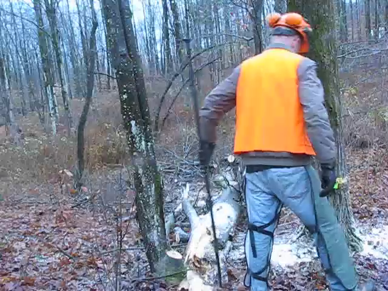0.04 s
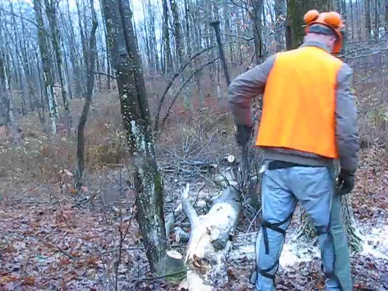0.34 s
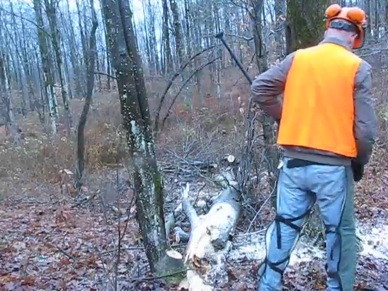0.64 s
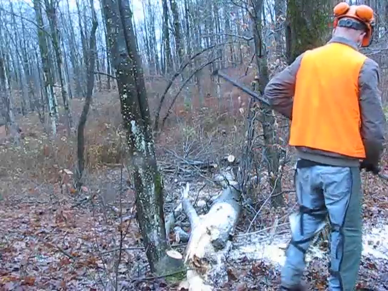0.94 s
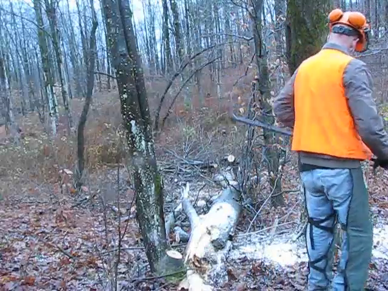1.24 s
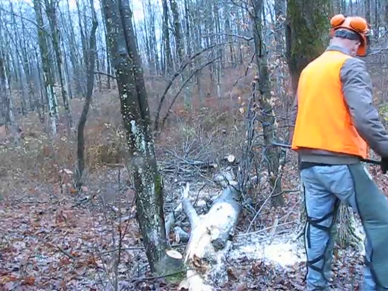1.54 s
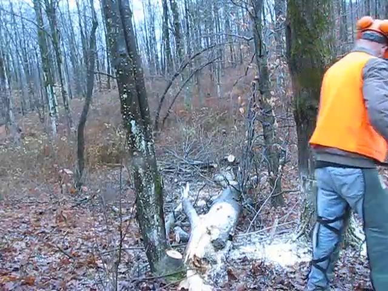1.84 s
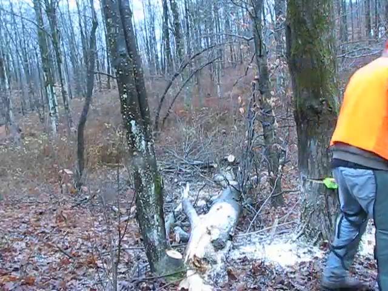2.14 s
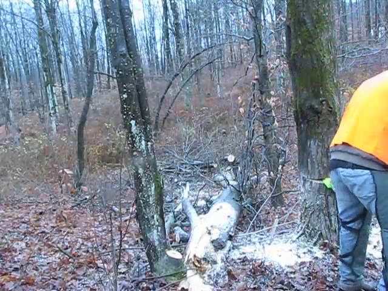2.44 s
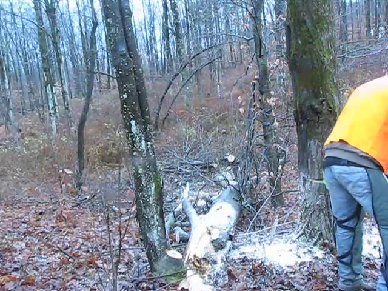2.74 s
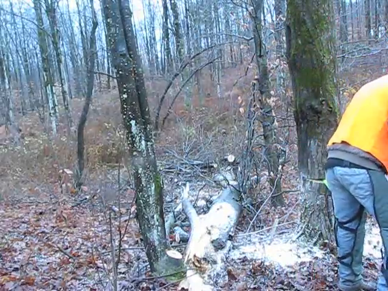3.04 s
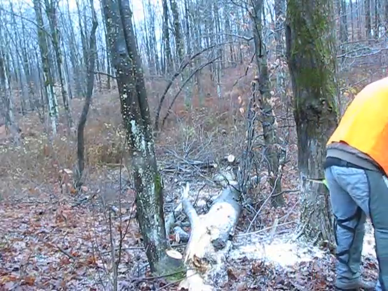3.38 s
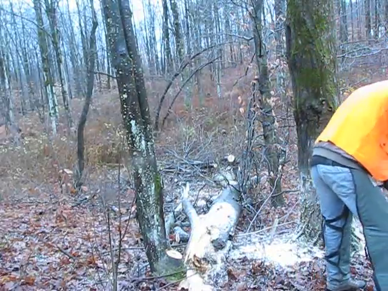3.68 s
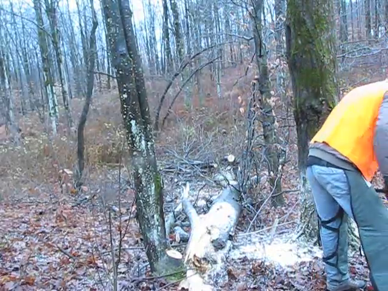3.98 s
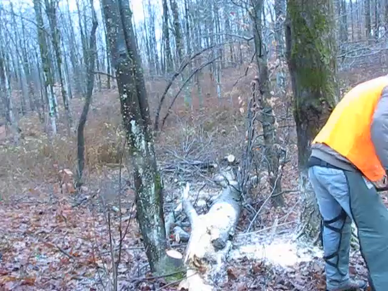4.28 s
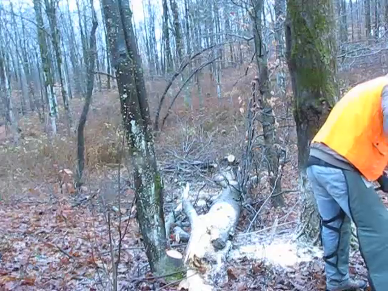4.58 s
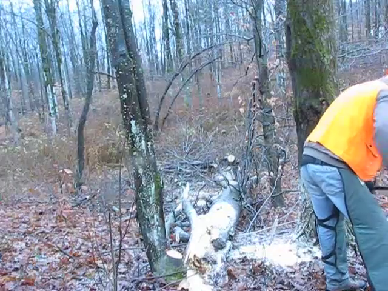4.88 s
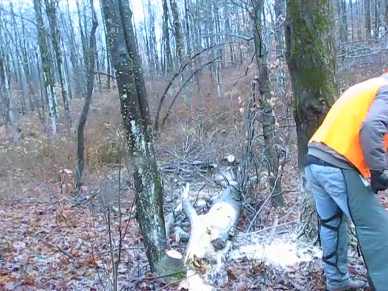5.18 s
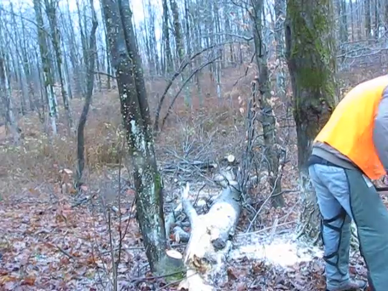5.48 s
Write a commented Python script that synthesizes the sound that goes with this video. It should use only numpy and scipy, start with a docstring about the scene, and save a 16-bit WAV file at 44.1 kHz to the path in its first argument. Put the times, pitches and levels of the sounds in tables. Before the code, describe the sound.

After steps in crackling dry leaves, an axe hammers a wedge into a trunk three times, each crack ringing metallically through the forest.

```python
"""Over faint forest air, a man steps through dry leaves and snapping twigs and halts at a standing tree.
He drives a felling wedge into it with three blows of an axe's poll. Each impact cracks in the wood,
sets the steel head ringing in its modes and sends bending waves along the trunk. Nearby ground and
trunks scatter the sound, then the forest answers with a long soft tail and an echo from a far slope.
Between blows his jacket swishes with the backswing."""
import sys
import numpy as np
from scipy import signal
from scipy.fft import rfft, irfft, next_fast_len
from scipy.io import wavfile
from scipy.ndimage import uniform_filter1d, map_coordinates

SR = 44100
rng = np.random.default_rng(int(sys.argv[2]) if len(sys.argv) > 2 else 0)


def unload_audio(sound):
    """Save the sound as a 16-bit wav file, at the path given as the first command line argument."""
    columns = np.transpose(np.atleast_2d(sound))
    # keep every value between -1 and 1, then stretch to whole-number steps
    steps = np.round(np.clip(columns, -1, 1) * 32767)
    wavfile.write(sys.argv[1], SR, steps.astype(np.int16))


N = 247842
T = np.arange(N) / SR
LN_1000 = np.log(1000)  # an amplitude decay of 60 dB, reached at time t60


# spectrum of the crack in the wood: f/Hz, level/dB
CRACK_SPECTRUM = [(25, 5.5), (80, 3), (160, 22), (320, 9), (900, 21.5), (3000, 16), (4600, 12), (6500, 1.5),
                  (10000, -1), (16000, -17)]
# wedge in its cut: f/Hz, bandwidth/Hz, relative level/dB at blows 1, 2, 3
WEDGE_MODES = [(519, 47, 9.5, 35.5, 33.9), (658, 89.4, 24, 31.8, 31.6), (847, 63, 18, 24.4, 24.3),
               (1150, 34, 35.5, 28.4, 30.2), (1268, 76, 31.5, 22, 28), (1586, 178, 33.5, 29, 30.6),
               (1768, 88, 32.5, 24, 29), (1982, 170, 29.5, 26.1, 23), (2580, 575, 22, 19.1, 20.3),
               (3230, 120, 9, 5, 26.1), (3640, 460, 16, 23.9, 18.4)]

def wedge(blow, crack_db, seating):
    """Source and filter: the contact force excites a broad crack and damped modes of wedge and wood."""
    t = T[:4096]
    response = amp(crack_db) * impulse(CRACK_SPECTRUM)
    for k, (hz, width, *db) in enumerate(WEDGE_MODES):
        gain = (-1) ** k * amp(db[blow]) * 2 * np.pi * width / SR
        response += gain * np.exp(-np.pi * width * t) * np.cos(2 * np.pi * hz * t)
    return signal.fftconvolve(response, contact_force(seating, slide=0.0046, slide_db=-16.5))


def contact_force(seating, slide, slide_db, size=1024):
    """Friction, then impact: the wedge grates forward and seats, in a burst with a flat spectrum."""
    t = (np.arange(size) - size // 2) / SR
    swell = np.exp(-np.abs(t) / seating) + amp(slide_db) * (t > -slide) * (t < 0)
    burst = rng.standard_normal(size)
    for _ in range(12):  # impose the envelope and the flat spectrum in turn
        loudness = np.sqrt(np.abs(uniform_filter1d(burst ** 2, size=40))) + 1e-6
        phase = np.angle(rfft(burst * swell / loudness))
        burst = irfft(np.exp(1j * phase))
    return burst * np.clip((t + slide) / .0006, 0, 1)


# steel axe head: f/Hz, t60/s, relative level/dB at blows 1, 2, 3
HEAD_MODES = [(490, .55, -42, -54, -54), (917, .6, -52, -29, -50), (1396, 1.3, -39, -56, -47),
              (1800, .24, -28, -44, -43), (2404, .7, -53, -49, -55), (2805, .33, -48, -33, -34),
              (3635, .28, -40, -26, -47), (3852, .16, -38, -30, -48), (4090, .16, -35, -30, -48),
              (4232, .42, -51, -34, -50), (4344, .28, -39, -51, -57), (4568, .22, -43, -41, -41),
              (5078, .28, -62, -38, -52), (5658, .24, -60, -42, -58), (6134, .14, -57, -39, -54),
              (6505, .14, -46, -67, -68), (7115, .28, -60, -44, -62)]

def steel_ring(blow):
    """Free vibration: the head rings on, and the point of impact decides which modes are excited."""
    t = T[:SR]
    ring = sum(amp(db[blow]) * np.exp(-LN_1000 * t / t60) * np.sin(2 * np.pi * (hz * t + rng.random()))
               for hz, t60, *db in HEAD_MODES)
    return ring * (1 - np.exp(-t / 0.00033))


def clank(db, t60, count=28):
    """Higher modes of the steel: short inharmonic overtones, sparser and weaker upward."""
    t = T[:SR // 3]
    height, weakness, phase = rng.random((count, 3)).T[:, :, None]
    hz = 4800 * 3 ** height
    modes = amp(db - 10 * height - 10 * weakness) * np.sin(2 * np.pi * (hz * t + phase))
    return modes.sum(axis=0) * np.exp(-LN_1000 * t / t60)


# spectrum of the shaking trunk: f/Hz, level/dB
TRUNK_SPECTRUM = [(25, -20), (80, -15.5), (115, -6), (190, 0), (250, -5.5), (350, -12.5), (480, -14.5),
                  (1000, -64.5)]
# its bending modes: f/Hz
TRUNK_MODES = [120, 143, 172, 200]

def trunk(hold, t60):
    """Bending waves run along the trunk and shake the ground; the lowest modes hum on a little."""
    t = T[:SR // 2]
    shake = coloured(rng.standard_normal(len(t)), TRUNK_SPECTRUM)
    shake /= np.sqrt(np.abs(uniform_filter1d(shake ** 2, size=1300)))
    shake *= np.exp(-LN_1000 * np.maximum(t - hold, 0) / t60)
    modes = sum(np.sin(2 * np.pi * (hz * t + rng.random())) for hz in TRUNK_MODES)
    hum = amp(-7) * modes * np.exp(-LN_1000 * t / .36)
    return (shake + hum) * (1 - np.exp(-t / 0.0031))


# spectra returned by near trunks, forest and far slope: f/Hz, level/dB
NEAR_SPECTRUM = [(60, -26), (300, -27), (520, -9.5), (900, 0), (1600, -4.5), (3500, -1), (8000, -4.5),
                 (16000, -11.5)]
FOREST_SPECTRUM = [(60, -8.5), (380, -12), (480, -7), (620, -1.5), (1000, -2), (1600, -3), (2600, -4),
                   (4000, -6.5), (8000, -1), (16000, -24.5)]
SLOPE_SPECTRUM = [(100, -16), (400, -49), (650, 5.5), (1000, -18), (1400, -2.5), (2500, -21), (6000, -18),
                  (16000, -24)]
# reverberation times of near trunks and forest: f/Hz, t60/s
NEAR_DECAY = [(150, 0.18), (600, 0.37), (1500, 0.23), (4000, 0.12), (12000, 0.15)]
FOREST_DECAY = [(150, 1.1), (600, 3.7), (1500, 3.4), (3500, 1.6), (6000, 0.61), (12000, .6)]
# blows: t/s, relative level/dB of knock, crack, trunk, near scatter, forest; seating/s, clank/dB
AXE_BLOWS = [(2.7349, -0.5, 2, 1, -6.5, -19, 0.0013, -43),
             (3.8488, -1.5, 2, 1.5, -2.5, -16, 0.00089, -33.5),
             (4.9545, 0, -2.5, -3.5, -7, -19.5, 0.00081, -48)]

def axe():
    """Impact and reflection: each blow arrives directly, then by ever longer paths through the forest."""
    out = np.zeros((2, N))
    for blow, (s, db, crack_db, trunk_db, near_db, forest_db, seating, clank_db) in enumerate(AXE_BLOWS):
        knock = amp(db) * wedge(blow, crack_db, seating)
        onset = s - 512 / SR  # the force peaks midway through its burst
        ring = amp(1) * steel_ring(blow)
        forest = amp(forest_db) * scatter(FOREST_DECAY, FOREST_SPECTRUM, build=0.029, size=2 * SR)
        add(out, onset, knock)
        add(out, s, ring)
        add(out, s, amp(1) * convolved(ring, forest))
        add(out, s, np.array([clank(clank_db, t60=.17) for side in range(2)]))
        add(out, s, amp(trunk_db - 33.5) * trunk(hold=0.039, t60=0.31))
        # bright glances off the ground differ on each side
        glances = np.diff(rng.standard_normal((2, 512)), axis=1) * np.exp(-T[1:512] / .002)
        glances /= np.linalg.norm(glances[0])
        near = scatter(NEAR_DECAY, NEAR_SPECTRUM, build=0.00067, size=SR // 2)
        # a stand of trunks some ten metres off throws back a rough slap
        slap = scatter([(500, 0.073), (4000, 0.027)], NEAR_SPECTRUM, build=0.0024, size=SR // 4)
        echo = scatter([(500, .05), (4000, .04)], SLOPE_SPECTRUM, build=.002, size=SR // 4)
        paths = [(glances, 0, -3.5), (near, 0, near_db), (forest, 0, 0),
                 (slap, .052, -24), (echo, .451, -26.5)]
        for response, delay, path_db in paths:
            add(out, onset + delay, amp(path_db) * convolved(knock, response))
    return out


# spectrum of dry leaves: f/Hz, level/dB
LEAF_SPECTRUM = [(59, -55), (100, -15.5), (398, -4), (502, -4), (691, -2.5), (1010, -1.5), (1280, -3),
                 (1520, -1), (3940, 0.5), (4980, -0.5), (6420, -6.5), (15000, -17), (16000, -38)]
# boots set down or dragged: t/s, duration/s, relative level/dB, crunch offset/dB, fizz offset/dB
BOOT_STEPS = [(0.104, 0.067, -46, -6, -9), (.2, 0.043, -50.5, -7, -8.5), (.39, 0.49, -52, -8.5, -17),
              (.75, .265, -50.5, -7, -7.5), (1.103, 0.073, -45, -10, -12.5), (1.415, 0.24, -51, -10, -9),
              (1.6, 0.12, -48, -7, -8), (1.825, 0.072, -52, -9, -17), (1.935, 0.044, -45, -12, -9),
              (2.085, 0.25, -51, -10.5, -16), (2.393, 0.043, -47.5, 1.5, -17),
              (2.48, 0.026, -53.5, 2.5, -12), (2.615, 0.05, -51.5, -9, -10.5),
              (3.552, 0.013, -51.5, -13.5, -9.5)]
# leaves and clothes between steps: relative level/dB, crunch offset/dB, fizz offset/dB
SHUFFLE_LEVELS = (-52, -6, -9.5)
STEP_ATTACK_S, STEP_SETTLE_S = 0.011, 0.034  # leaves give way, then settle
HALT_S, HALT_FADE_S = 2.453, 0.52  # he comes to a stand at the tree

def footsteps(breaks_per_s=70):
    """Incoherent sources add in power: leaves rub and break under boots, from low crunch to high fizz."""
    breaks = rng.random(N) < breaks_per_s / SR
    crackle = coloured(spread(rng.standard_normal((2, N)) * breaks), LEAF_SPECTRUM)
    leaves = unit(rustle(LEAF_SPECTRUM, grain_db=1.0, grain_rate=600)) + amp(-11.5) * unit(crackle)
    band = lambda lo_hz, hi_hz: unit(filtered(leaves, lambda hz: (hz >= lo_hz) & (hz < hi_hz)))
    walking = np.clip(1 - (T - HALT_S) / HALT_FADE_S, 0, 1)
    pushes = [(walking, *SHUFFLE_LEVELS)]
    for s, duration, *levels in BOOT_STEPS:
        attack = np.clip((T - s) / STEP_ATTACK_S, 0, 1)
        settle = np.exp(-np.maximum(T - s - duration, 0) / STEP_SETTLE_S)
        pushes.append((attack * settle, *levels))
    power = sum((amp([[db + crunch_db], [db], [db + fizz_db]]) * envelope) ** 2
                for envelope, db, crunch_db, fizz_db in pushes)
    patchy_litter = amp(wobble(rate=35))
    crunch, swish, fizz = np.sqrt(power) * patchy_litter
    return (amp(-0.34) * crunch * band(60, 1300) + amp(2.0) * swish * band(1300, 7480)
            + amp(3.5) * fizz * band(7400, 16500))


# twigs snapping, gear ticking: t/s, relative level/dB of peak, body, treble; ring f/Hz, left-right/dB
TWIG_SNAPS = [(.1085, -34, -4, 2, 2440, 14), (.4965, -30, -16, -4, 2400, -8),
              (0.6955, -28.5, -18, -15, 4450, -13.5), (.883, -18.5, -1.5, -3, 1920, 0.5),
              (.9705, -32, -17, -9, 4040, 0), (1.002, -32, -27, -3, 3650, -5),
              (1.2745, -26.5, -26, -4, 2070, 0), (1.8388, -34, -13, -44, 1000, -1.5),
              (1.9292, -23, -39, -9, 3960, -3), (1.9599, -18.5, -31, -7.5, 2270, -1),
              (2.1787, -26.5, -5, -3.5, 4180, -5.5), (2.491, -23, -12, -23, 1600, 2.5),
              (2.9764, -36.5, -22, -3.5, 4160, -7), (3.553, -29, -7, -1.5, 2930, 6)]
SPLIT_S, SPLIT_DB = .0045, -7  # the last fibres part just after the first crack

def snaps():
    """Brittle fracture: a twig breaks in two stages, rings briefly and stirs the leaves around it."""
    out, t = np.zeros((2, N)), T[:4096]
    crack = lambda start: (t >= start) * np.exp(-np.abs(t - start) / .0016)
    for s, db, body_db, treble_db, ring_hz, pan_db in TWIG_SNAPS:
        click = impulse([(200, body_db - 17), (700, body_db + 12), (2000, 0.0054), (4500, 0),
                         (8000, treble_db + 4), (15000, treble_db - 6.5)])
        ring = 0.14 * np.exp(-t / 0.00049) * np.cos(2 * np.pi * ring_hz * t)
        fracture = rng.standard_normal(len(t)) * (crack(0) + amp(SPLIT_DB) * crack(SPLIT_S))
        stir = amp(-11) * spread(rng.standard_normal((2, len(t)))) * np.exp(-t / .006)
        snap = convolved(click + ring, fracture + stir)
        gains = amp(db + 2 + np.array([[pan_db], [-pan_db]]) / 2)
        add(out, s, gains * snap / np.abs(snap).max())
    return out


# bumps in the ground: centre t/s, level/dB, f/Hz, half-width/s
GROUND_THUDS = [(0.763, -57, 245, 0.019), (1.174, -64, 45, .05), (1.591, -40, 417, 0.0049),
                (1.76, -62, 158, .02), (3.733, -61, 73, 0.035), (3.868, -49, 35, 0.0081),
                (4.201, -65, 62, 0.042), (4.532, -62, 82, 0.027), (4.69, -59.5, 79, 0.089),
                (4.817, -57.5, 122, 0.033)]

def thuds():
    """Band-limited noise pulses: soft, low bumps in the ground with no ring."""
    out = np.zeros((2, N))
    t = T[:SR // 2] - .25
    for s, db, centre_hz, half_width in GROUND_THUDS:
        noise = spread(rng.standard_normal((2, len(t))))
        bump = unit(filtered(noise, lambda hz: np.exp(-(np.log((hz + 1) / centre_hz) / .5) ** 2)))
        add(out, s - .25, amp(db) * bump * np.exp(-(t / half_width) ** 2))
    return out


# spectrum of sliding cloth: f/Hz, level/dB
CLOTH_SPECTRUM = [(1180, -36), (2000, -3.5), (2180, -5.5), (3010, -3.5), (5070, -7.5), (15100, -19.5),
                  (16000, -28)]
# backswings: t/s, relative level/dB at full speed
BACKSWINGS = [(3.1, -59.5), (4.25, -62)]
SWING_S, SWING_RISE_S, SWING_RISE_DB = .75, 0.36, 14

def jacket():
    """Friction noise: cloth slides as the axe is drawn back, louder as the arms gather speed."""
    cloth = rustle(CLOTH_SPECTRUM, grain_db=1.5, grain_rate=460)
    cloth = unit(filtered(cloth, lambda hz: hz / (hz + 500)))
    level = np.zeros(N)
    for s, db in BACKSWINGS:
        slowness = np.clip(1 - (T - s) / SWING_RISE_S, 0, 1)
        level += amp(db - SWING_RISE_DB * slowness) * (T > s) * (T < s + SWING_S)
    return amp(3.5) * cloth * uniform_filter1d(level, size=2000)


# spectrum of the forest air: f/Hz, level/dB
AIR_SPECTRUM = [(25, -0.5), (60, -3), (150, -12), (350, -3.5), (550, 1.5), (1200, 2), (2500, -6.5),
                (5000, -15), (10000, -23.5), (16000, -27.5)]

def forest_air():
    """Stationary noise: a faint, even hush."""
    return amp(-59) * unit(coloured(spread(rng.standard_normal((2, N))), AIR_SPECTRUM))


def scatter(decay, spectrum, build, size):
    """Multiple scattering: a stereo response builds up, then each frequency dies at its own rate."""
    hz, t, bins = signal.stft(rng.standard_normal((2, size)), SR, nperseg=256)
    t60 = along(decay, hz)[:, None]
    equal_energy = np.sqrt(2 * LN_1000 / (t60 * SR))
    tail = signal.istft(bins * amp(-60 * t / t60) * equal_energy, SR, nperseg=256)[1]
    rise = 1 - np.exp(-(T[:tail.shape[1]] / build) ** 2)
    return coloured(spread(tail), spectrum) * rise


def rustle(spectrum, grain_db, grain_rate):
    """Superposition: countless tiny contacts of unequal size merge into grainy stereo noise."""
    knots = rng.standard_normal(N)
    sizes = amp(grain_db * np.interp(T * grain_rate, np.arange(N), knots))
    return coloured(spread(rng.standard_normal((2, N)) * sizes), spectrum)


# likeness of left and right: f/Hz, correlation
COHERENCE = [(30, 0.13), (70, .7), (250, 0.87), (650, 0.89), (1400, 0.64), (3100, 0.17), (7000, 0.48),
             (15000, 0.055)]

def spread(pair):
    """Partial coherence: two unrelated signals become a stereo field, most alike in the low middle."""
    turn = lambda hz: np.arccos(np.clip(along(COHERENCE, hz), -1, 1)) / 2
    mid, side = filtered(pair, lambda hz: np.array([np.cos(turn(hz)), np.sin(turn(hz))]))
    return np.array([mid + side, mid - side])


def impulse(points, size=4096):
    """Minimum phase: the shortest causal click with a given (f/Hz, level/dB) spectrum."""
    cepstrum = irfft(np.log(amp(along(points, np.fft.rfftfreq(size, 1 / SR)))))
    cepstrum[1:size // 2] *= 2
    cepstrum[size // 2 + 1:] = 0
    return irfft(np.exp(rfft(cepstrum)))


def filtered(x, response):
    """Linear filtering: the spectrum of x times a frequency response."""
    n = x.shape[-1]
    padded = next_fast_len(n + 8192)
    return irfft(rfft(x, padded) * response(np.fft.rfftfreq(padded, 1 / SR)), padded)[..., :n]


def coloured(x, points):
    """Spectral shaping by (f/Hz, level/dB) points."""
    return filtered(x, lambda hz: amp(along(points, hz)))


def convolved(mono, pair):
    """Convolution of one signal with each side of a pair."""
    return signal.fftconvolve(mono[None], pair, axes=1)


def along(points, hz):
    """Interpolation of (f/Hz, value) points on a log axis."""
    f, values = np.transpose(points)
    return np.interp(np.log(hz + 1), np.log(f), values)


def wobble(rate):
    """Spline through random knots, rate of them a second."""
    return map_coordinates(rng.standard_normal(4096), [T * rate], mode="wrap")


def amp(db):
    """Decibels to amplitude ratio."""
    return 10 ** (np.asarray(db) / 20)


def unit(x):
    """Normalisation to rms 1."""
    return x / np.sqrt(np.mean(x ** 2) + 1e-20)


def add(track, s, x):
    """Superposition of x on track from time s."""
    start = max(round(s * SR), 0)
    track[..., start:start + x.shape[-1]] += x[..., :N - start]


def scene():
    """Time and level differences: the work is on the right, so the left hears it later and duller."""
    work = axe() + footsteps() + jacket() + snaps() + thuds()
    shade = [(700, 0), (1400, .3), (2500, 0.89), (15000, 0.53)]  # f/Hz, right boost and left cut/dB
    sides, lag_s = np.array([[-1], [1]]), 4.8e-5
    from_right = lambda hz: amp(sides * along(shade, hz)) * np.exp(1j * np.pi * sides * hz * lag_s)
    return filtered(work, from_right) + forest_air()


def record(dry, ceiling=.95, top_hz=15800):
    """Saturation rounds off the highest peaks; a steep low-pass limits the band."""
    rounded = dry / (1 + np.abs(dry / ceiling) ** 6) ** (1 / 6)
    return filtered(rounded, lambda hz: 1 / np.sqrt(1 + (hz / top_hz) ** 160))


dry = scene()
out = record(dry)
unload_audio(out)
```